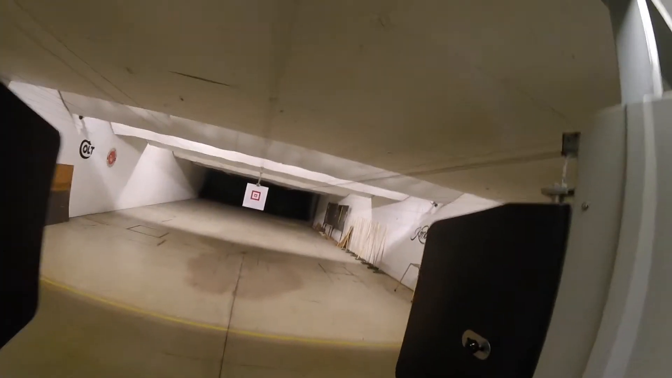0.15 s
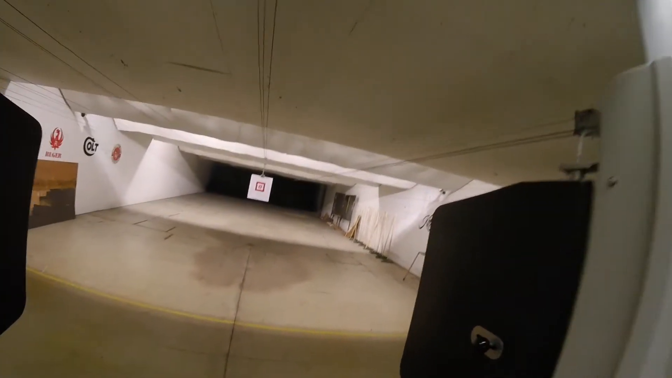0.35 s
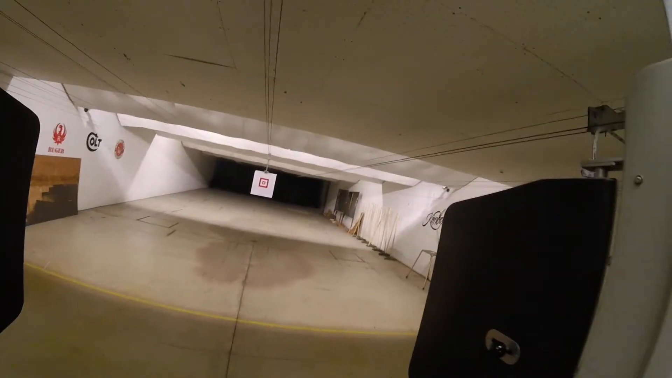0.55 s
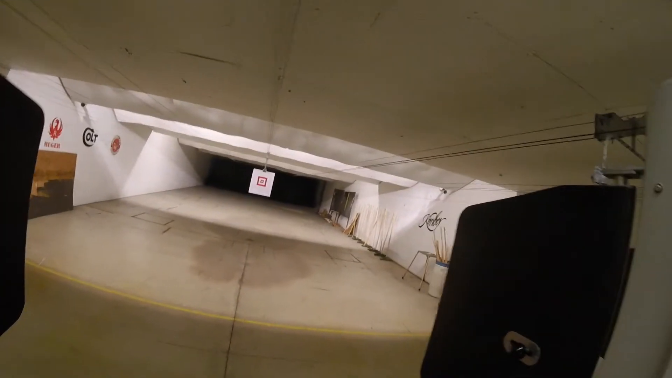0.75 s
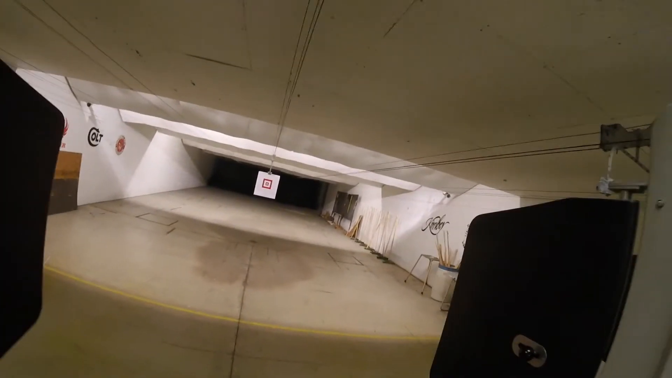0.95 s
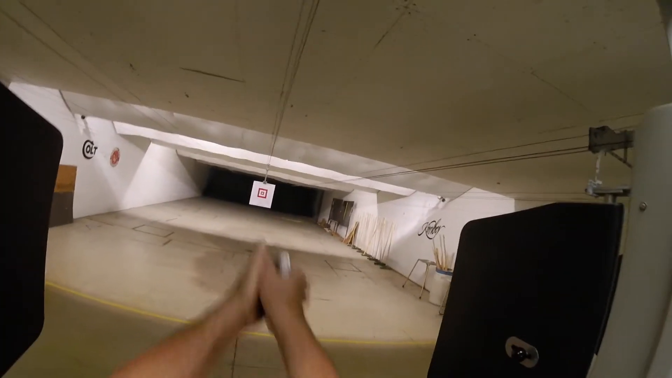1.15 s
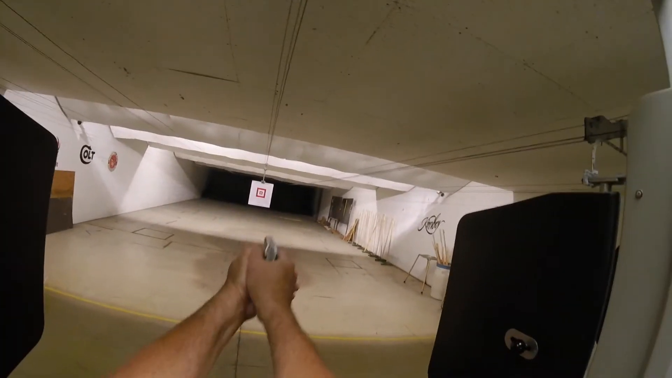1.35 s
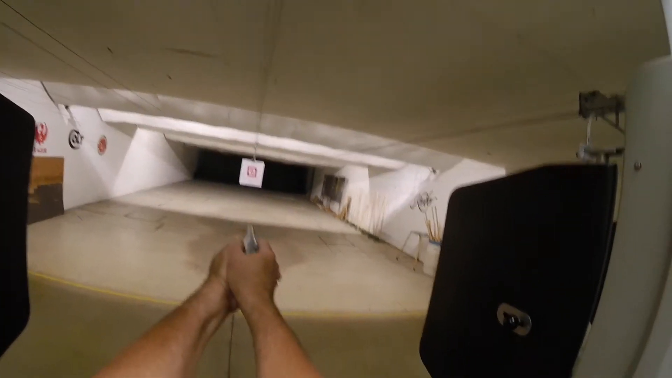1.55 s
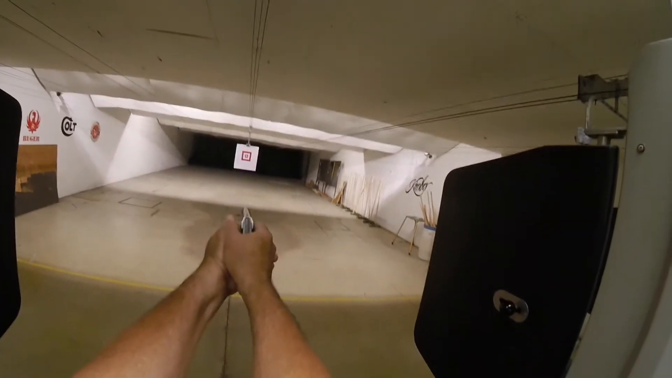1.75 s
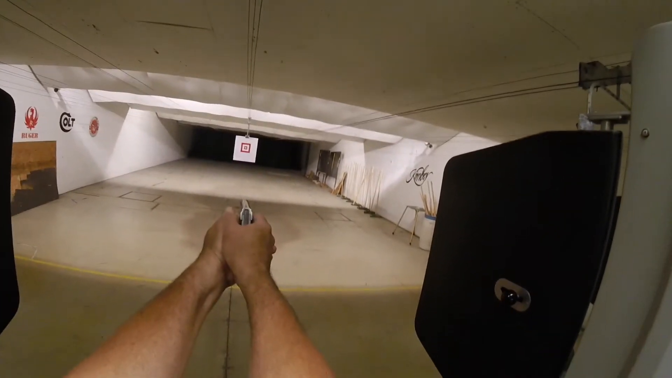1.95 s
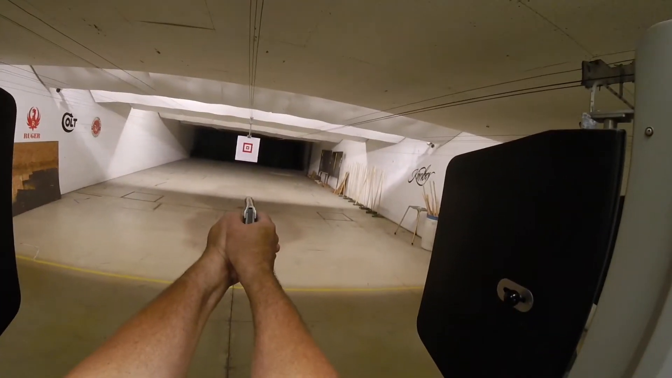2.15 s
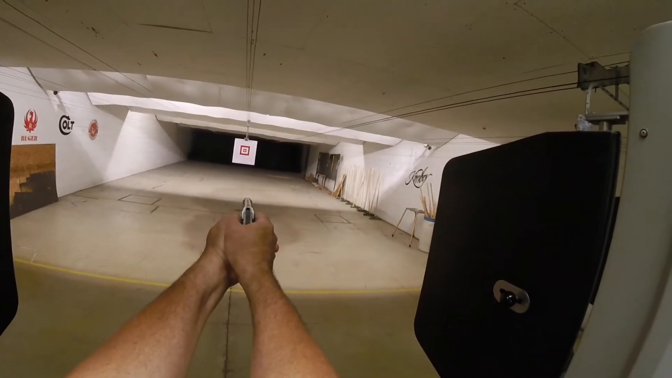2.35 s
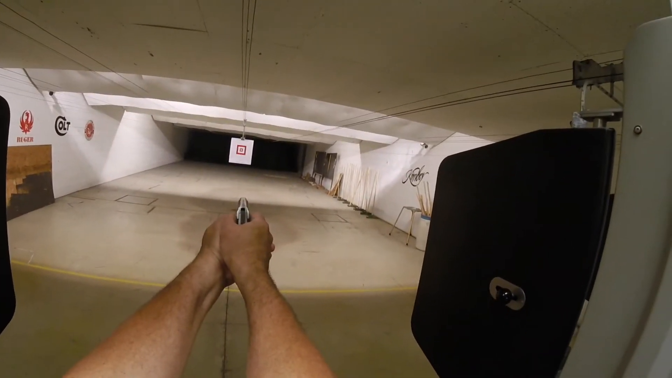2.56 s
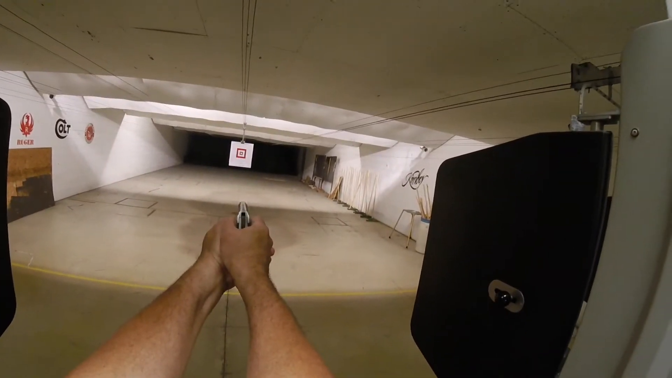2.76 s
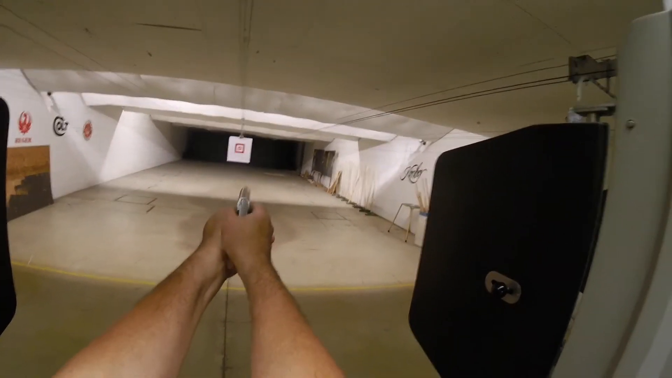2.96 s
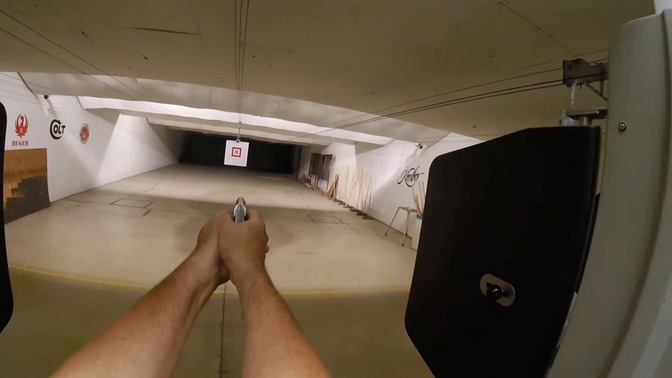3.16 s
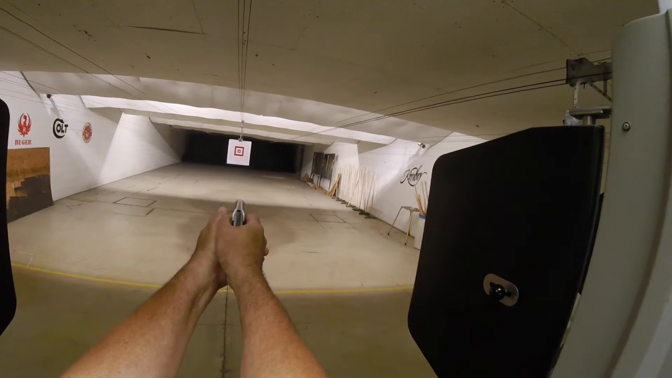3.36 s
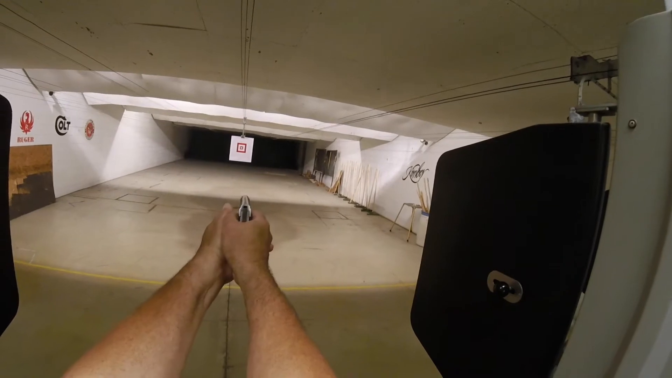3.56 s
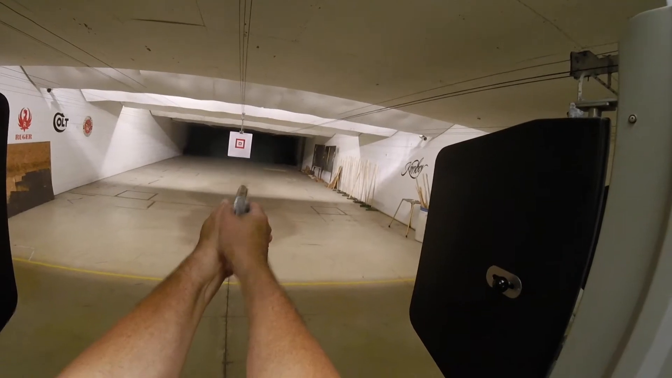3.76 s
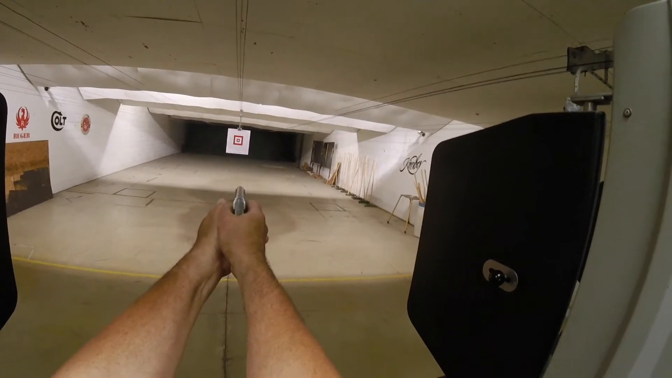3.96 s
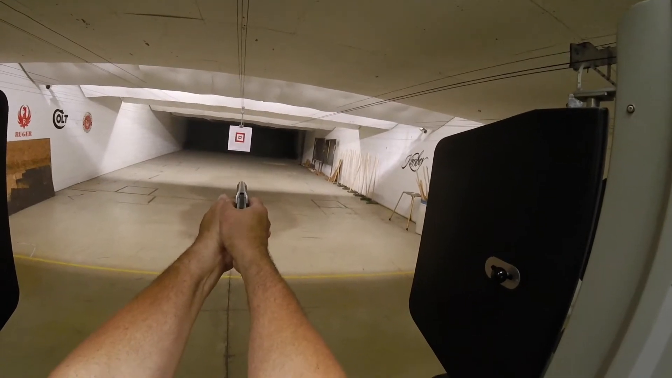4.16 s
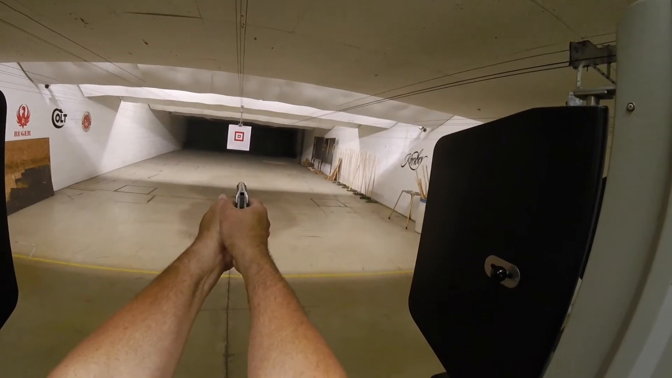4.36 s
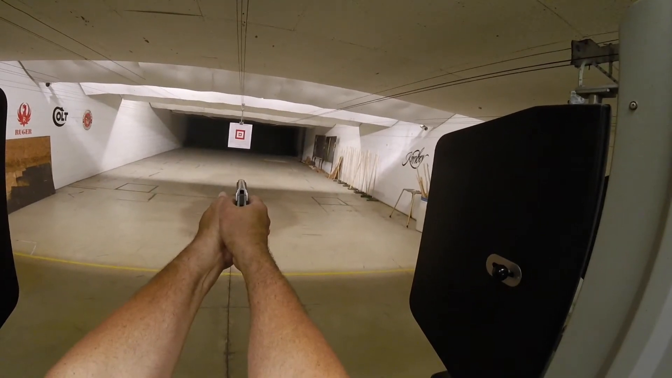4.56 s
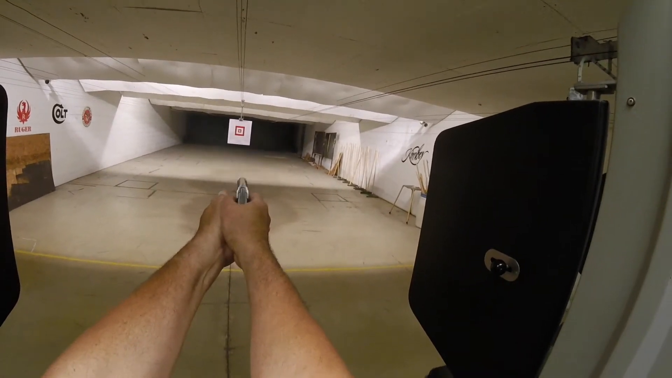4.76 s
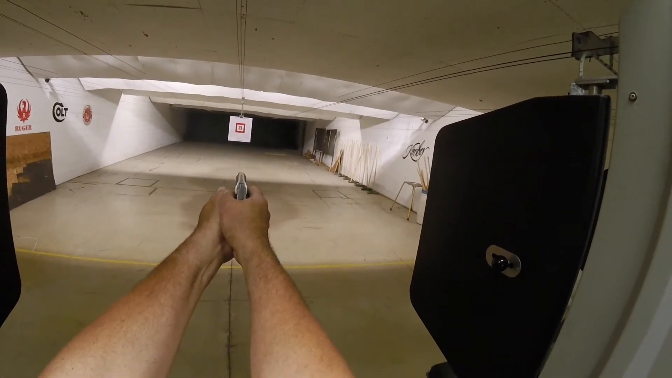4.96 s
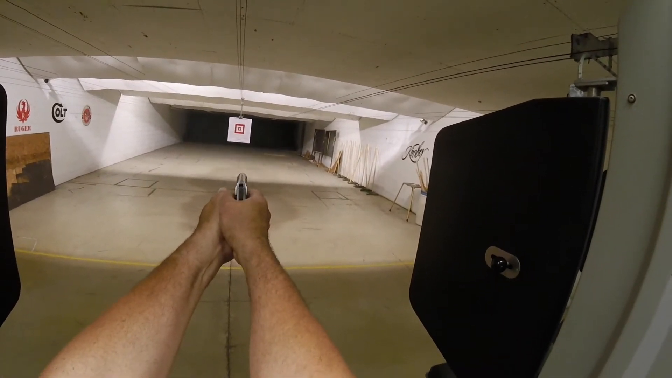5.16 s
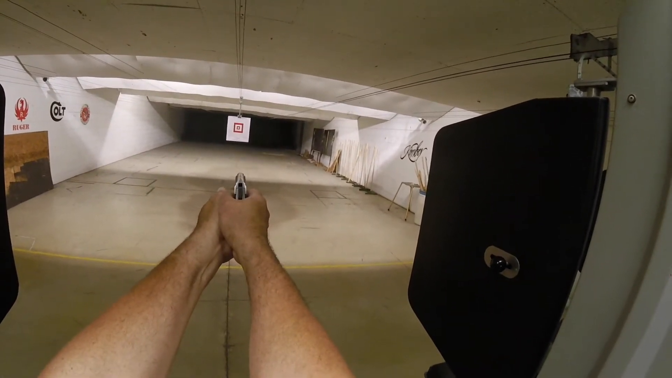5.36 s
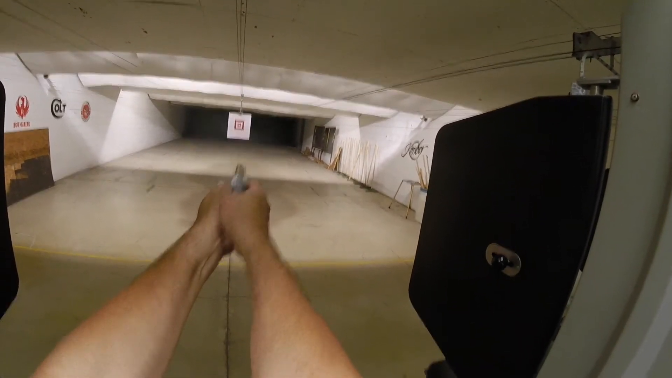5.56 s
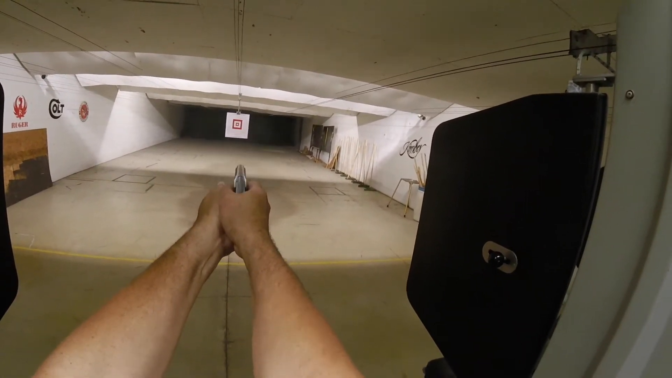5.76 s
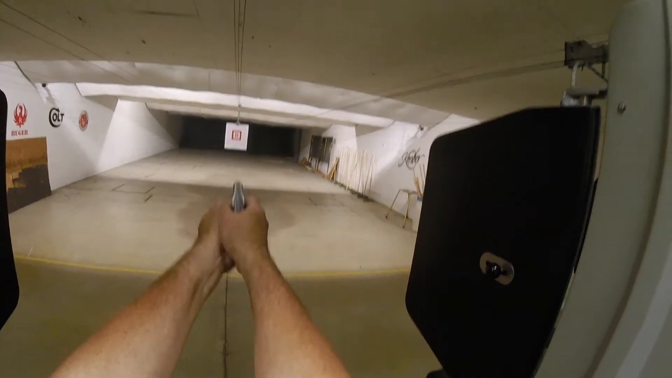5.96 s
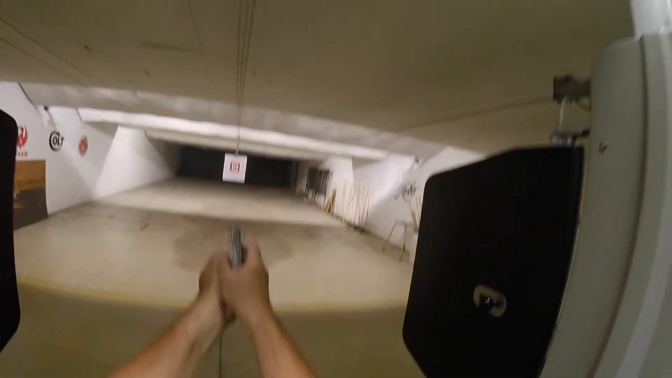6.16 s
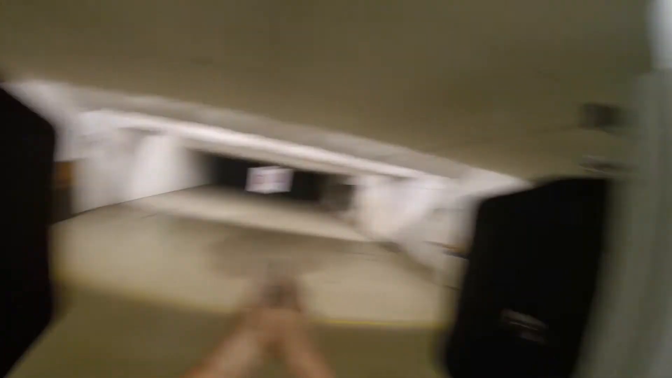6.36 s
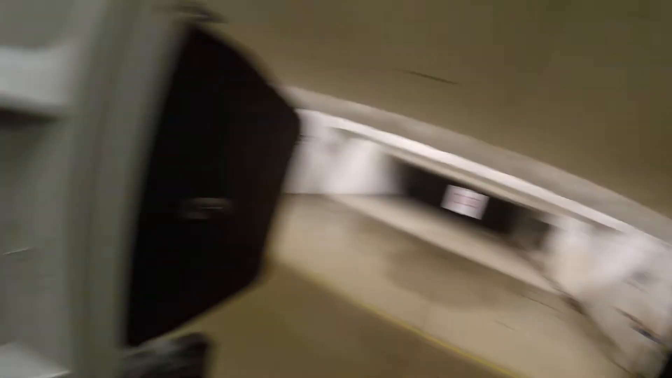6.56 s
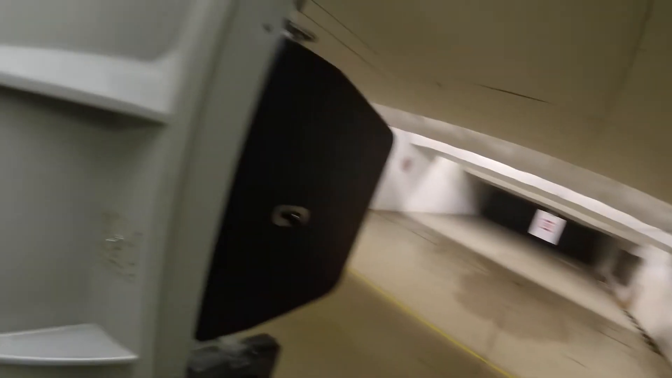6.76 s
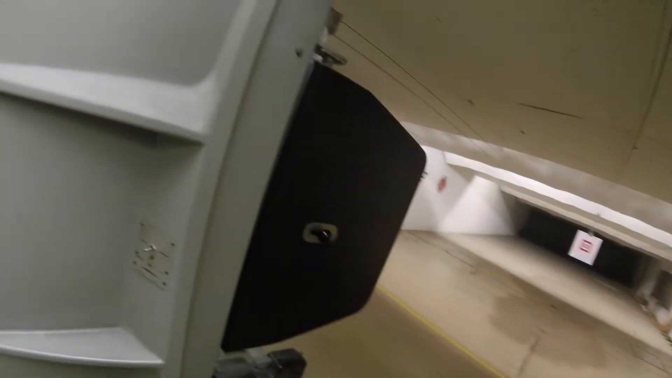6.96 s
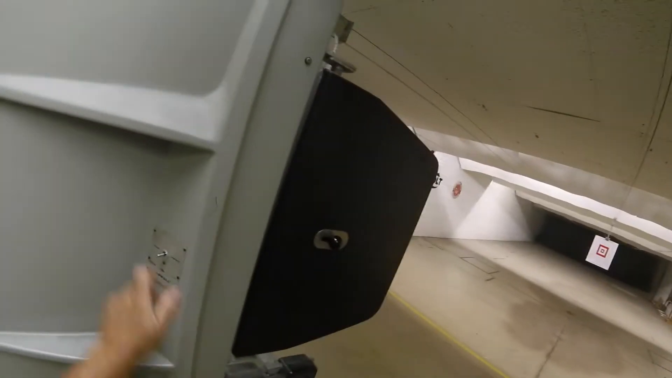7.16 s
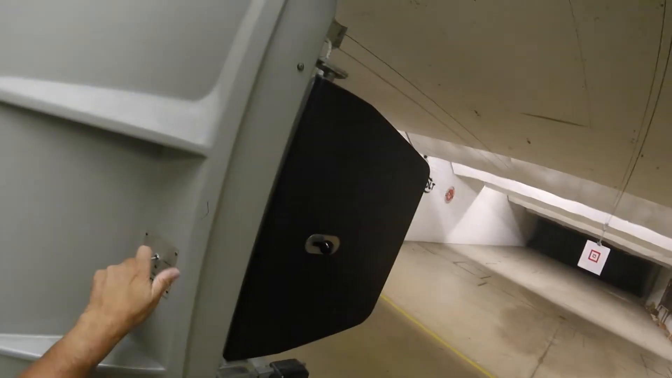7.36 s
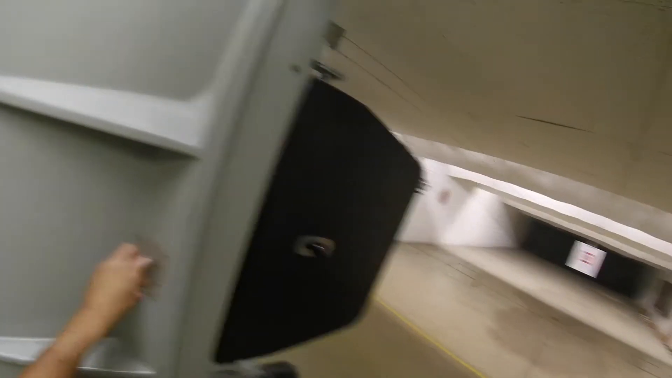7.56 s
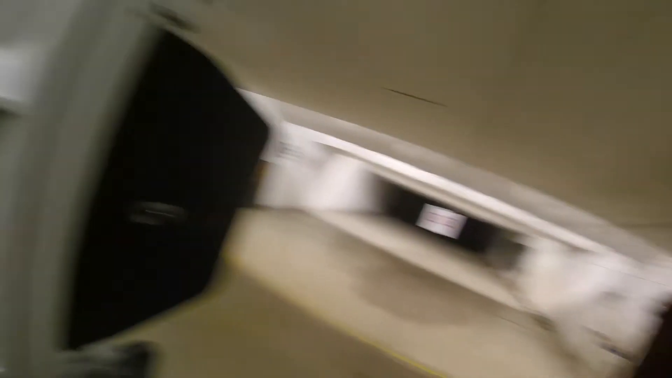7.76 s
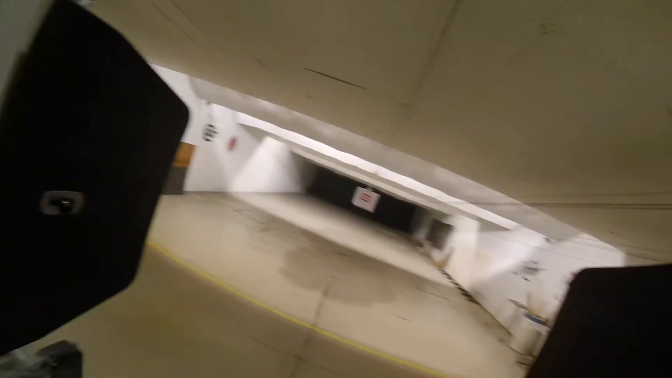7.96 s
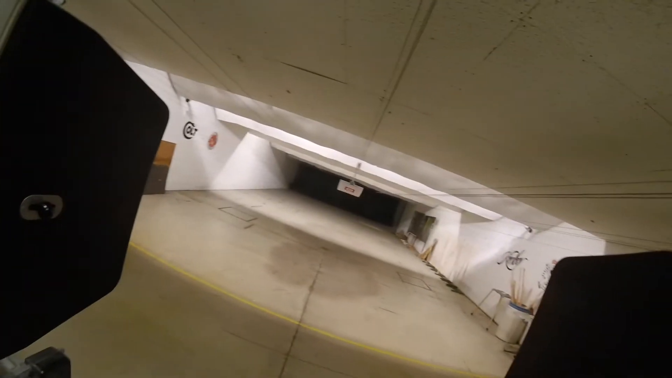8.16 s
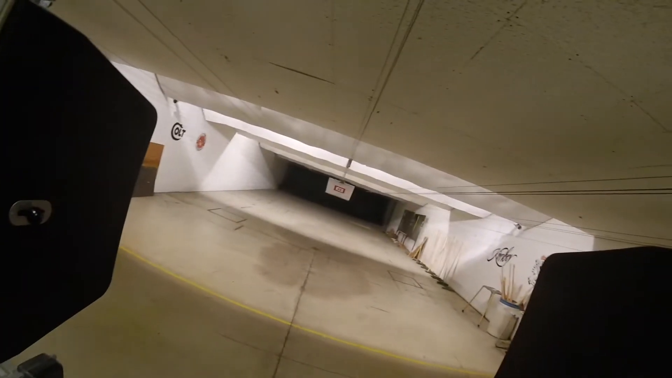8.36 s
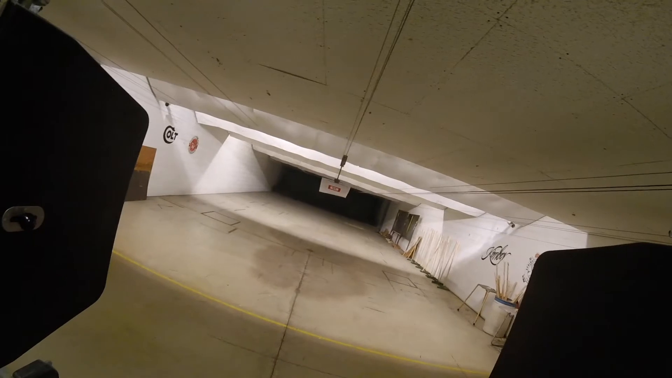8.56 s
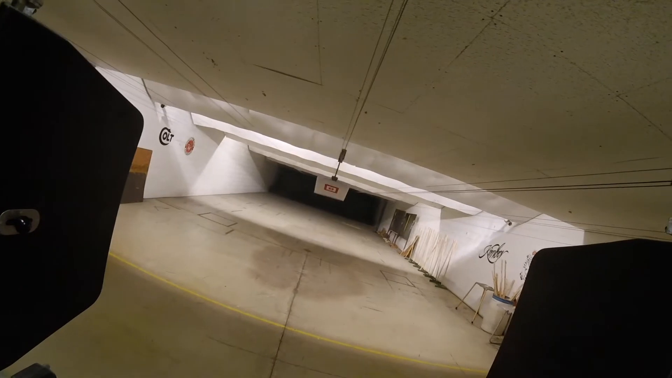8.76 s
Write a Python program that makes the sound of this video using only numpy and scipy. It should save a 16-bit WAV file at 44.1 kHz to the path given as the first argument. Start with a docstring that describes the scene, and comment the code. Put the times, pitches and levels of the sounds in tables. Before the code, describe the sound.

Over low ventilation rumble, a small pistol fires four hard, clipped shots with ringing hall tails; metal handling, a switch click, then an electric carrier motor whirs.

```python
"""Ventilation rumbles in a long concrete indoor range: noise and fan tones; cloth rustles and clicks are faint.
A small pistol fires four shots: pressure pulses overload a head-worn microphone, and fading noise fills the hall.
A gain control turns the sound down just ahead of each blast, then creeps back up under the tail.
Casings and the pistol clink and scrape (ringing noise), and a switch snaps (decaying sines).
Last, the target carrier's motor spins up: wavering tones and noise that beats once a turn."""
import sys
import numpy as np
from scipy import signal
from scipy.fft import rfft, irfft
from scipy.io import wavfile
from scipy.ndimage import uniform_filter1d, minimum_filter1d, map_coordinates

SR = 44100
rng = np.random.default_rng(int(sys.argv[2]) if len(sys.argv) > 2 else 0)


def volts(x):
    """Linear amplitude factor 10**(x/20) for a level x in dB, scalar or array-like."""
    e = np.asarray(x, float) / 20
    return 10 ** e


def file_out(sig):
    """Save sig as 16-bit WAV at sys.argv[1]."""
    # one column per channel
    cols = np.atleast_2d(sig).T
    # limit, then scale
    lim = np.clip(cols, -1, 1)
    pcm = np.round(lim * 32767).astype(np.int16)
    wavfile.write(sys.argv[1], SR, pcm)


N = 388080
T = np.arange(N) / SR  # time in seconds

# Colour of the ventilation rumble. Each row: frequency in Hz, level in dB per Hz.
AIR_COLOUR = [(14, -19), (24, -6), (65, -10.5), (136, -17.5), (230, -26.5), (470, -36.5), (800, -41.5),
              (2000, -46), (4400, -58), (6700, -51.5), (9000, -48), (14000, -63)]
# Level at which the ventilation, its tones and the hiss are picked up over time. Each row: time in seconds,
# level in dB.
AIR_LEVEL = [(0, -49), (2.4, -45), (2.86, -46), (3.2, -52), (6.5, -54.5), (7.1, -52), (7.7, -48.5)]
# Fan shaft tones over the rumble. Each row: frequency in Hz, level in dB.
FAN_TONES = [(29.4, 1), (58.8, 1.5)]
HISS_DB = -20.5  # hiss relative to the rumble
# The head turns into the booth and back. Each row: time in seconds, hall in dB, upper fan tone in dB.
HEAD_TURN = [(6.3, 5, -2), (6.65, -2, -6), (7.0, -1, -7), (7.4, 1.5, -9), (7.9, -2.5, -2.5)]

# Cloth rustle, pistol slid on the bench, sleeve reaching for the switch.
# Each row: start in seconds, level in dB, attack in seconds, seconds from start to fade, t60 in seconds.
SCRAPES = [(0.607, -67, 0.013, 0.027, 0.22), (6.839, -47.5, 0.008, 0.074, 0.36),
           (6.974, -67.5, 0.1, 0.29, 0.6)]
# Casings, pistol and switch. Each row: start in seconds, level in dB (6 dB above the rms),
# ringing frequency in Hz, t60 in seconds.
CLICKS = [(1.29, -60, 3500, .06), (2.68, -59, 4600, .05), (5.347, -32, 5370, 0.22), (6.159, -31, 6900, .04),
          (6.295, -39, 5640, 0.044), (6.647, -39.5, 3470, 0.22), (6.769, -47.5, 3000, 0.24),
          (6.847, -40, 3588, 0.045), (7.637, -45, 4900, 0.023), (7.648, -43, 4560, 0.022),
          (7.714, -54, 4200, 0.05), (7.7202, -35, 4700, 0.022), (7.722, -43, 910, 0.24),
          (7.834, -53, 3500, 0.11)]
CLICK_WIDTH_HZ = 3250
# A casing bouncing on the floor. Each row: start in seconds, level in dB (6 dB above the rms).
BOUNCES = [(6.514, -48), (6.566, -56), (6.647, -51), (6.769, -53)]
# What the casing rings with. Each row: frequency in Hz, width in Hz, level in dB, t60 in seconds.
CASING_MODES = [(5600, 1300, -0.5, 0.26), (12750, 200, -1, .9)]
SWITCH_S = 7.7198  # when the switch snaps, in seconds
# Ringing of the switch's wall plate. Each row: frequency in Hz, level in dB, t60 in seconds.
SWITCH_MODES = [(286, -30, 0.048), (790, -43, 0.036), (1100, -48, .05), (1350, -42, 0.037)]
# The switch lever is touched, slips and snaps over. Each row: start in seconds, level in dB.
LEVER_BLOWS = [(7.638, -52), (7.648, -64), (7.7155, -40.5), (7.7208, -49)]
# Ringing of the lever. Each row: frequency in Hz, level in dB, t60 in seconds.
LEVER_MODES = [(2800, 0.5, 0.039), (3257, -6, .03), (4060, -5, .04), (5230, -10, 0.046), (5860, -15, .045)]

# The four shots. Each row: start in seconds, blast in dB, low thump in dB.
SHOTS = [(2.8662, 32, 26.5), (3.7865, 32.5, 25.5), (4.6555, 32, 32), (5.577, 32.5, 36.5)]
# Pressure surge in the booth. Each row: frequency in Hz, level in dB, t60 in seconds.
THUMP_MODES = [(40.6, -17.5, .1), (78, -19.5, 0.051), (115, -20, 0.049)]
# Ringing of booth and housing. Each row: frequency in Hz, level in dB, t60 in seconds.
BOOTH_RING = [(333, -21, 0.048), (530, -26, 0.056), (679, -13, .06), (1067, -5, 0.044), (1518, -6.5, 0.026),
              (2080, -13.5, 0.049), (3060, -21, 0.022), (6600, -8, 0.012)]
RING_BUILD_MS = 3.3
CRACKLE_PEAK_MS, RATTLE_PEAK_MS = 1.1, 2.84
OVERLOAD_DB = 39  # ceiling of the capsule
# Booth reflections: first arrival, and gap as a share of the pulse length.
FIRST_MS, GAP_SHARE = .2, 1.05
# Pulse length before scatter: grows from short to long, on the time scale WIDEN_MS.
SHORT_MS, LONG_MS, WIDEN_MS = .21, .69, 1.9
# Pulse loudness: builds up, then falls after FADE_MS; SCATTER_DB is its random spread.
PULSE_DB, BUILD_MS, FADE_MS, FADE_DB_PER_MS, SCATTER_DB = 3.5, 1, 4.4, 11.5, 1
# One slow swing of pressure.
REBOUND_MS, REBOUND_DB, REBOUND_LONG_MS = 5.8, -10, 4.5
# Long inverted echoes off the side panels. Each row: arrival in ms, level in dB, length in ms.
PANELS = [(5.4, 3.5, 0.84), (7.9, -7, 1.2), (10.4, -11, 0.84)]
# Sharp echoes off hard faces. Each row: arrival in ms, level in dB, length in ms.
SLAPS = [(7.32, -10, 0.25), (24.3, -8, 0.27)]
# Echo of the hall. Each row: frequency in Hz, near-wall level in dB, near-wall t60 in seconds,
# far level in dB, far t60 in seconds.
HALL = [(30, -10.5, .12, -53, 0.81), (81, -5, .15, -32, 1.7), (204, -10, 0.33, -27, 1.88),
        (392, 0, 0.15, -17, 1.75), (750, 0.5, 0.4, -13.5, 1.676), (1064, -4, 0.49, -10.5, 1.534),
        (1350, -1, 0.49, -15, 1.7), (1630, 2.5, 0.33, -18, 1.67), (2100, 0.5, 0.2, -20.5, 1.49),
        (2700, -1.5, 0.079, -19, 1.5), (3260, -1, 0.19, -19.5, 1.31), (4430, -10, 0.39, -23.5, 1.48),
        (7130, -8.5, 0.14, -28.5, 1.004), (11000, -8, 0.072, -25.5, 0.47), (12500, -6, .03, -49.5, .4),
        (15500, -20, .02, -71.5, 0.61)]
# Standing waves of the hall. Each row: frequency in Hz, level in dB, t60 in seconds.
STANDING_WAVES = [(363.3, -20.5, 1.9), (371.4, -22.5, 1.6), (456, -19, 1.9), (478, -26.5, 1.9),
                  (626, -23.5, 1.7), (755, -21, 1.8), (822, -23, 2), (974, -21.5, 1.8)]
PATHS_SHIFT_MS = .04  # pistol and head move a little, so the hall's paths differ from shot to shot

# Motor loudness: a steep run-up bends into a slow rise as the carriage nears.
MOTOR_S, RUN_UP_S, RUN_UP_DB_PER_S, LOAD_DB, NEARING_DB_PER_S = 7.775, 0.27, 130, -38.5, 8
SHAFT_HZ = 28.9
DRUM_S, DRUM_IDLE_DB, DRUM_DB = 7.77, -50, -1
RUMBLE_DB = -0.5
HUM_FOLLOWS = 0.69  # dB the hum changes per dB of load
TONES_LAG = 0.77  # whine and gear ring: extra dB lost per dB under full load
# Steady tones of the drum. Each row: frequency in Hz, level in dB.
DRUM_TONES = [(503, -2), (519, -7.5), (533, -2)]
# What the teeth ring in the drum. Each row: frequency in Hz, width in Hz, relative level in dB per Hz.
DRUM_MODES = [(526, 48, -6), (550, 13, -22), (600, 19, -18), (714, 43, -15), (761, 11, -13)]
# What the teeth ring in the gearbox. Each row: frequency in Hz, width in Hz, relative level in dB per Hz.
GEAR_MODES = [(1522, 23, 0), (1790, 120, -2.5), (2014, 19, 2.5), (2640, 80, 1), (3020, 320, -8),
              (3255, 55, -7), (4200, 40, 0), (5220, 53, -7), (7500, 110, -11), (9900, 45, -38)]
# Colour of the whirr. Each row: frequency in Hz, relative level in dB per Hz.
WHIRR_COLOUR = [(200, -31), (900, -23.5), (1300, -16), (2600, -16), (4000, -24.5), (7600, -30.5),
                (10000, -29.5), (11000, -56), (13500, -27), (14200, -63)]
# Motor hum. Each row: frequency in Hz, level in dB relative to the load.
HUM = [(29.4, -8.5), (58.8, -5), (118, -10.5), (172, -3), (181.5, -6), (204, -8), (416, -13.5),
       (625, -12.5)]
# Motor whine. Each row: frequency in Hz, level in dB relative to the load.
WHINE = [(1803, -11), (2015, -13), (2094, -16), (2168, -14), (2562, -12), (2632, -4.5), (2939, -17),
         (3278, -16), (4210, -12.5), (5270, -25), (7504, -20)]
WHINE_WAVER_DB, WHINE_DRIFT = 4, .002  # drift is a share of the pitch
# How the treble follows the load. Each row: lower edge in Hz, dB lost per dB under full load.
TREBLE = [(1750, -0.1), (3600, 0.7)]
# A rough tone swells and fades while the rotor gathers speed.
STRAIN_HZ, STRAIN_DB, STRAIN_S, STRAIN_WIDE_S = 772, -53, 7.87, 0.11
# The carriage takes up slack. Each row: start in seconds, level in dB.
JERKS = [(7.806, -41), (8.016, -30.5)]
JERK_HZ, JERK_T60_S = 116, 0.52

PORT_HZ, PORT_WIDTH_HZ, PORT_DB = 6423, 310, 6.5  # resonance of the sound port
TOP_HZ = 8600  # the housing dulls what lies above
# Gain control timing: block length, first block, how far it looks ahead, length of a quick step.
BLOCK_S, FIRST_BLOCK_S, AHEAD_S, STEP_S = .01067, .0011, .0595, .0012


def unit(x):
    """Scale to rms 1."""
    return x / np.sqrt(np.mean(x ** 2))


def resonate(x, hz, width_hz):
    """Let through a band around hz, with gain 1 at its centre."""
    return signal.lfilter(*signal.iirpeak(hz, hz / width_hz, fs=SR), x)


def ringing_noise(count, hz, width_hz):
    """Noise through the same resonance twice, at rms 1."""
    once = resonate(rng.standard_normal(count), hz, width_hz)
    return unit(resonate(once, hz, width_hz))


def low_pass(x, order, hz):
    """Keep what lies below hz."""
    return signal.sosfilt(signal.butter(order, hz, fs=SR, output="sos"), x)


def high_pass(x, order, hz):
    """Keep what lies above hz."""
    return signal.sosfilt(signal.butter(order, hz, "high", fs=SR, output="sos"), x)


def ring(t, modes):
    """Sines that die away, as a struck object's do after a blow at t = 0."""
    return sum(volts(db) * np.sin(2 * np.pi * hz * t) * volts(-60 * t / t60) for hz, db, t60 in modes)


def colour(x, spectrum):
    """Shape the spectrum by points of frequency and dB."""
    hz, db = np.transpose(spectrum)
    f = np.fft.rfftfreq(len(x), 1 / SR) + 1
    gain = volts(np.interp(np.log(f), np.log(hz), db))
    return irfft(rfft(x) * gain, len(x))


def walk(rate):
    """Slow random wander with rms near 1, taking a new value rate times a second."""
    k = int(SR / rate)
    steps = np.repeat(rng.standard_normal(N // k + 1), k)
    return unit(uniform_filter1d(steps, k))[:N]


def add(out, s, x):
    """Mix x into out from time s."""
    i = int(s * SR)
    out[i:i + len(x)] += x[:N - i]


def tones(lines, waver_db, drift):
    """Sines whose level wavers and whose pitch drifts a little."""
    total = 0
    for hz, db in lines:
        level = volts(db + waver_db * walk(12))
        turns = hz * np.cumsum(1 + drift * walk(15)) / SR
        total = total + level * np.sin(2 * np.pi * (turns + rng.random()))
    return total


def turned(column):
    """Gain from the turn of the head."""
    table = np.transpose(HEAD_TURN)
    return volts(np.interp(T, table[0], table[column]))


def air():
    """Ventilation: duct rumble that surges in the bass and fan shaft tones, with a smooth hiss alongside."""
    noise = unit(colour(rng.standard_normal(N), AIR_COLOUR))
    bass = low_pass(noise, 2, 150)
    rumble = noise - bass + bass * volts(0.91 * walk(12))
    hiss_band = signal.ellip(5, .5, 50, [10900, 12900], "band", fs=SR, output="sos")
    hiss = volts(HISS_DB) * unit(signal.sosfilt(hiss_band, rng.standard_normal(N)))
    low_tone = tones(FAN_TONES[:1], 1.2, 0.0027)
    upper_tone = tones(FAN_TONES[1:], 1.5, 0.0027) * turned(column=2)
    level = volts(np.interp(T, *np.transpose(AIR_LEVEL)))
    return (hiss + rumble + low_tone + upper_tone) * level


def scrapes():
    """Rubbing surfaces: band-limited noise with a quickly jumping level, swelling and dying away."""
    rough = rng.standard_normal(N) * volts(1.3 * walk(330))
    grit = unit(resonate(resonate(rough, 2230, 3240), 2300, 3800))
    out = np.zeros(N)
    for s, db, attack_s, hold_s, t60 in SCRAPES:
        attack = np.clip((T - s) / attack_s, 0, 1)
        fade = volts(-60 * np.maximum(T - s - hold_s, 0) / t60)
        out += grit * attack * volts(db) * fade
    return out


def clinks():
    """Small objects struck or bouncing: bands of ringing noise that die away."""
    out, t = np.zeros(N), T[:SR // 2]
    for s, db, hz, t60 in CLICKS:
        add(out, s, volts(db - 60 * t / t60) * ringing_noise(len(t), hz, CLICK_WIDTH_HZ) / 2)
    for s, db in BOUNCES:
        for hz, width_hz, mode_db, t60 in CASING_MODES:
            fade = volts(db + mode_db - 60 * t / t60)
            add(out, s, ringing_noise(len(t), hz, width_hz) * fade / 2)
    return out


def switch():
    """Blows on the lever ring it, and the snap rings the wall plate, as decaying sines."""
    out, t = np.zeros(N), T[:SR // 2]
    add(out, SWITCH_S, -ring(t, SWITCH_MODES))
    for s, db in LEVER_BLOWS:
        add(out, s, volts(db) * ring(t, LEVER_MODES))
    return out


def booth():
    """Reflections from hands, walls, bench and ceiling: each follows on the last, growing longer, then weaker."""
    rows = [(REBOUND_MS, volts(REBOUND_DB), REBOUND_LONG_MS)]
    rows += [(at, -volts(db), long_ms) for at, db, long_ms in PANELS]
    rows += [(at, volts(db), long_ms) for at, db, long_ms in SLAPS]
    ms = FIRST_MS
    for loud, wide, late in rng.standard_normal((16, 3)):
        typical_ms = LONG_MS - (LONG_MS - SHORT_MS) * np.exp(-(ms / WIDEN_MS) ** 2)
        long_ms = typical_ms * np.exp(.13 * wide)
        build = 1 - np.exp(-ms / BUILD_MS)
        db = PULSE_DB - FADE_DB_PER_MS * max(ms - FADE_MS, 0) + SCATTER_DB * loud
        rows.append((ms, build * volts(db), long_ms))
        ms += GAP_SHARE * long_ms * np.exp(.13 * late)
    return rows


def blast(reflections):
    """N-shaped pressure pulses off the booth, with crackle, overload the capsule; booth and housing ring."""
    t = T[:SR // 2]
    t_ms = t * 1000
    pulses = np.zeros(len(t))
    scatter = rng.standard_normal((len(reflections), 2))
    for (ms, size, long_ms), (late, loud) in zip(reflections, scatter):
        u = (t_ms - ms - .06 * abs(late)) / long_ms  # runs from 0 to 1 over the pulse
        edges = np.clip(np.minimum(u, 1 - u) / 0.16, 0, 1)  # short ramps at both ends
        pulses += size * volts(0.34 * loud) * (1 - 2 * u) * edges
    u = t_ms / CRACKLE_PEAK_MS
    swell = (u + .15) * np.exp(1 - u)  # swells, then dies
    crackle = 0.7 * resonate(rng.standard_normal(len(t)), 6900, 3000) * swell
    u = t_ms / RATTLE_PEAK_MS
    later_swell = (u * np.exp(1 - u)) ** 3
    rattle = resonate(resonate(rng.standard_normal(len(t)), 3300, 1300), 3300, 1300)
    crackle += 1.6 * rattle * later_swell  # lower and later
    crackle += 0.84 * resonate(rng.standard_normal(len(t)), 12500, 3500) * np.exp(-t / 0.0025)  # sharpest edges
    overloaded = np.tanh(0.85 * (pulses + crackle))
    return overloaded + ring(t, BOOTH_RING) * (1 - np.exp(-t_ms / RING_BUILD_MS))


def hall():
    """Diffuse echo of one blast: each third-octave dies at a quick near-wall rate and a slow far rate."""
    t = T[:3 * SR]
    f = np.fft.rfftfreq(len(t), 1 / SR) + 1
    noise, diffuse = rfft(rng.standard_normal(len(t))), 0
    table = np.transpose(HALL)
    for hz in 25 * 2 ** np.arange(0, 9.4, 1 / 3):
        near_db, near_t60, far_db, far_t60 = (np.interp(np.log(hz), np.log(table[0]), c) for c in table[1:])
        share = np.cos(np.pi * np.clip(1.5 * np.log2(f / hz), -.5, .5))  # overlaps its neighbours
        near = volts(near_db - 60 * t / near_t60)
        far = volts(far_db - 60 * t / far_t60)
        diffuse = diffuse + unit(irfft(noise * share, len(t))) * np.hypot(near, far)
    standing = ring(t, STANDING_WAVES) * (1 - np.exp(-t / .05))
    return diffuse * (1 - np.exp(-t / 0.011)) + standing


def shots():
    """The same booth and hall answer every shot; the capsule rounds off the highest peaks."""
    direct, tail = np.zeros(N), np.zeros(N)
    echo, reflections = hall(), booth()
    t = T[:len(echo)]
    for s, blast_db, thump_db in SHOTS:
        thump = volts(thump_db) * ring(T[:SR // 2], THUMP_MODES)
        add(direct, s, volts(blast_db) * blast(reflections) + thump)
        # read the echo at slightly wandering times
        shift = PATHS_SHIFT_MS * SR / 1000 * walk(30)[:len(echo)] * np.minimum(t + .3, 1)
        add(tail, s, map_coordinates(echo, [np.arange(len(echo)) + shift], mode="nearest"))
    out = direct + tail * turned(column=1)
    return volts(OVERLOAD_DB) * np.tanh(out / volts(OVERLOAD_DB))


def rung_by_teeth(teeth, modes):
    """Tooth noise through a set of resonances, at rms 1."""
    return unit(sum(volts(db) * unit(resonate(teeth, hz, w)) * np.sqrt(w) for hz, w, db in modes))


def motor():
    """Hum and whine, and gear teeth that knock hardest once a turn and ring drum and gearbox."""
    t = T - MOTOR_S - RUN_UP_S
    # steep run-up bends into a slow rise
    load_db = LOAD_DB - np.logaddexp(-RUN_UP_DB_PER_S * t / 2, -NEARING_DB_PER_S * t / 2) * 2
    under_full_db = np.minimum(load_db - LOAD_DB, 0)
    turn = np.cos(2 * np.pi * SHAFT_HZ * T)
    teeth = rng.standard_normal(N) * volts(0.47 * turn + .4 * walk(60))

    drum_gain = np.hypot(volts(DRUM_IDLE_DB), volts(load_db + DRUM_DB)) * np.clip((T - DRUM_S) / 0.058, 0, 1)
    drum = volts(-2.5) * rung_by_teeth(teeth, DRUM_MODES) + tones(DRUM_TONES, 1.6, 0.00393)

    # the hum grows with the load
    hum_db = load_db.max() + HUM_FOLLOWS * (load_db - load_db.max())
    hum = tones(HUM, 2.8, 0.00403) * volts(hum_db)

    whine = tones(WHINE, WHINE_WAVER_DB, WHINE_DRIFT) * (1 + 0.44 * turn)
    gears = volts(2.0) * rung_by_teeth(teeth, GEAR_MODES)
    whirr = volts(2.0) * unit(colour(teeth, WHIRR_COLOUR))
    rumble = volts(RUMBLE_DB) * unit(resonate(rng.standard_normal(N), 45, 41))  # the rail shakes
    running = (whine + gears) * volts(TONES_LAG * under_full_db) + whirr + rumble
    for hz, lag in TREBLE:
        dull = low_pass(running, 2, hz)
        running = dull + (running - dull) * volts(lag * under_full_db)

    switched_on = np.clip((T - SWITCH_S) / 0.03, 0, 1)
    out = drum_gain * drum + switched_on * (hum + volts(load_db) * running)
    strain = tones([(STRAIN_HZ, STRAIN_DB)], 3.6, 0.00764)
    out += strain * np.exp(-((T - STRAIN_S) / STRAIN_WIDE_S) ** 2)
    for s, db in JERKS:
        add(out, s, ring(T[:SR // 2], [(JERK_HZ, db, JERK_T60_S)]))
    return out


def scene():
    """Everything at the microphone."""
    return (air() + scrapes() + clinks() + switch() + shots() + motor())[None]


def gain_control(x, top_db=-37.5, slope=0.75, deepest_db=-38, release_s=0.091, window_s=0.019):
    """Block by block: drops at once for the loudest moment ahead, then creeps back up in dB."""
    k, w = int(AHEAD_S * SR), int(window_s * SR)
    starts = np.arange(FIRST_BLOCK_S, N / SR, BLOCK_S)
    heard = high_pass(x, 2, 90)  # deaf to rumble
    power = uniform_filter1d(heard ** 2, w, origin=(w - 1) // 2)  # of the sound just past
    ahead = -minimum_filter1d(-power, k, origin=-(k // 2))
    loudest = ahead[(starts * SR).astype(int)]
    wanted_db = slope * (top_db - 10 * np.log10(abs(loudest) + 1e-12))
    gain, knots = 0, []
    for want in np.clip(wanted_db, deepest_db, 0):
        # a big drop is taken at the block edge, any other change glides over the block
        knots.append(want if want < gain - 6 else gain)
        gain = min(want, gain + (want - gain) * min(BLOCK_S / release_s, 1))
        knots.append(gain)
    times = np.column_stack([starts, starts + BLOCK_S - STEP_S]).ravel()
    return x * volts(np.interp(T, times, knots))


def roll_off(x):
    """The treble ends steeply here."""
    return signal.sosfilt(signal.butter(12, 15750, fs=SR, output="sos"), x)


def record(dry):
    """The sound port resonates, the housing dulls the top, the gain control ducks, a high-pass follows."""
    x = dry[0] + volts(PORT_DB) * resonate(dry[0], PORT_HZ, PORT_WIDTH_HZ)
    x = low_pass(x, 4, TOP_HZ)
    x = gain_control(x)
    x = high_pass(x, 1, 18)
    return roll_off(x[None])


dry = scene()
out = record(dry)
file_out(out)
```